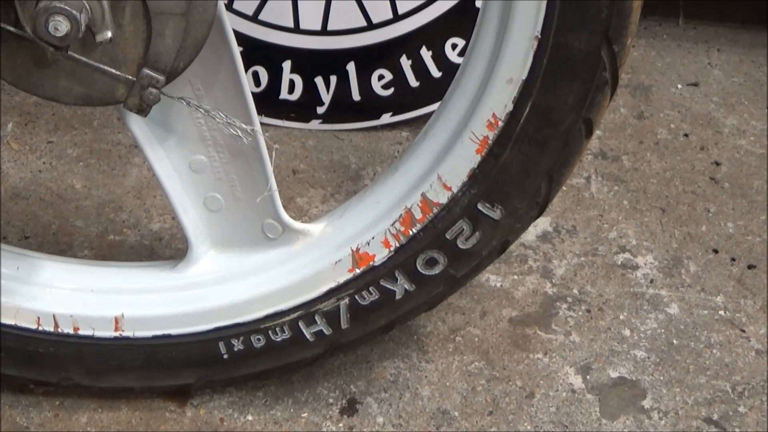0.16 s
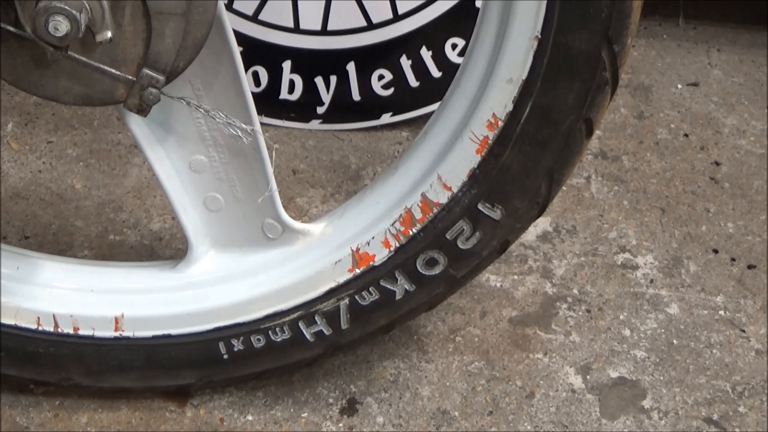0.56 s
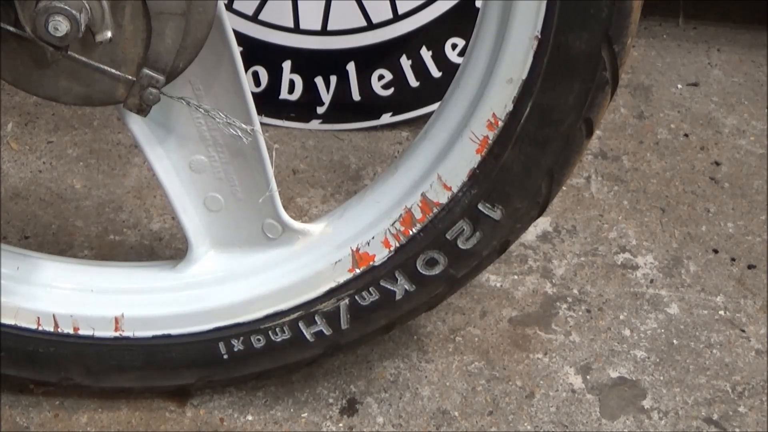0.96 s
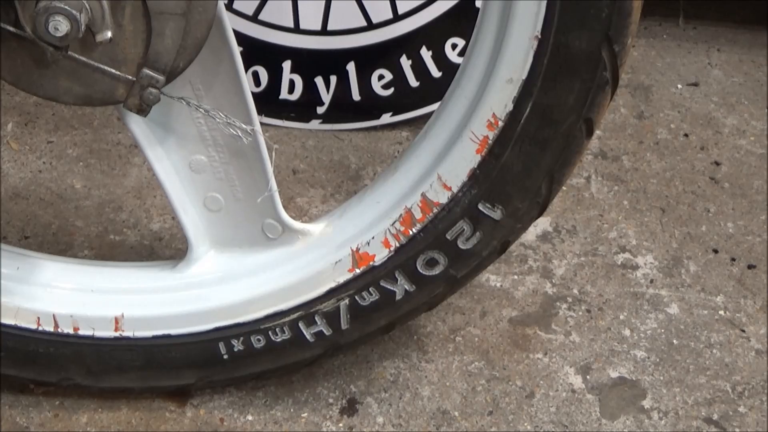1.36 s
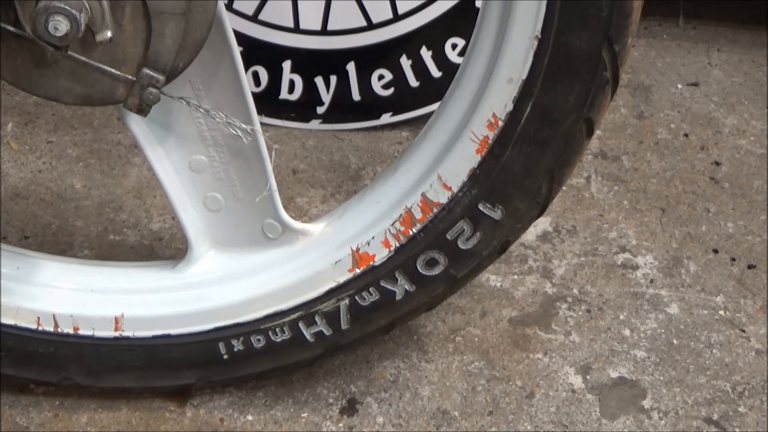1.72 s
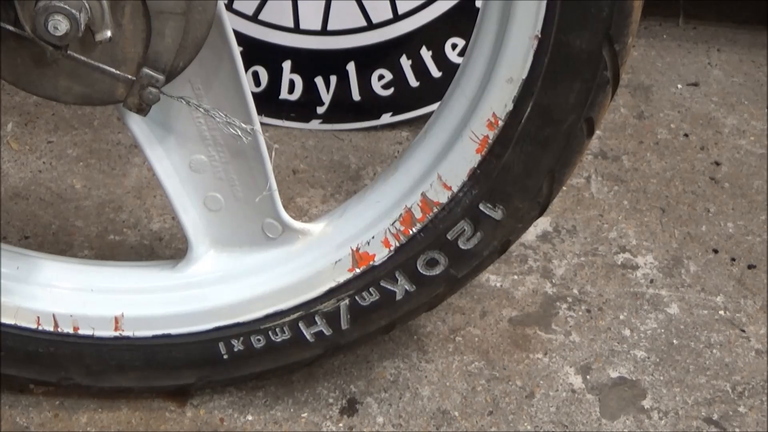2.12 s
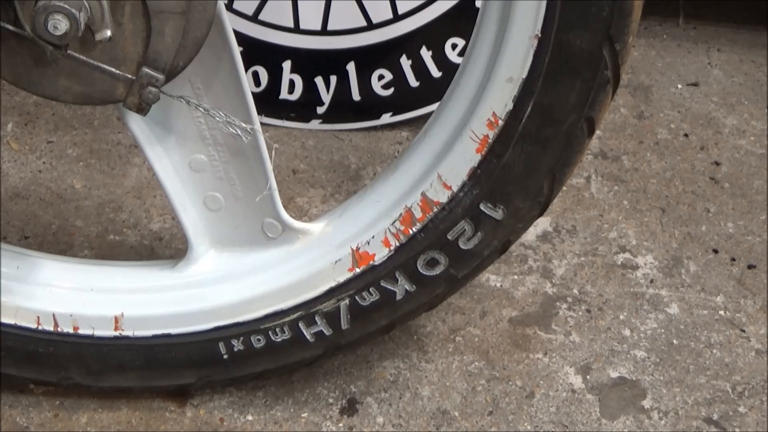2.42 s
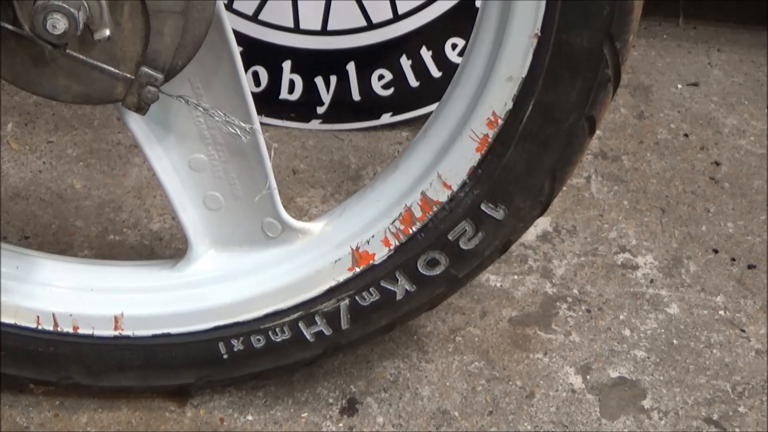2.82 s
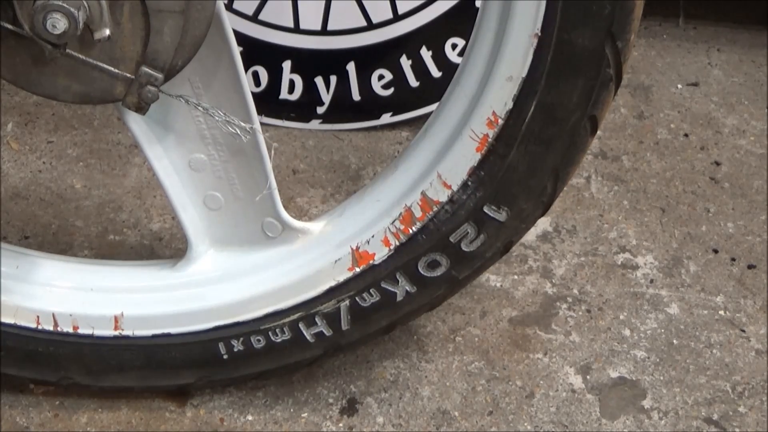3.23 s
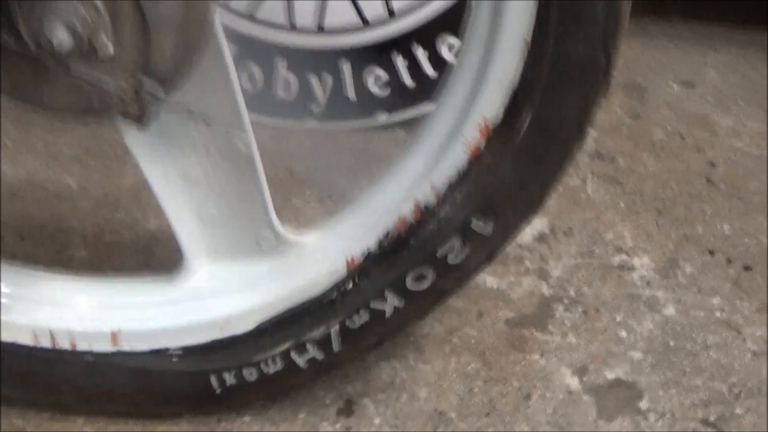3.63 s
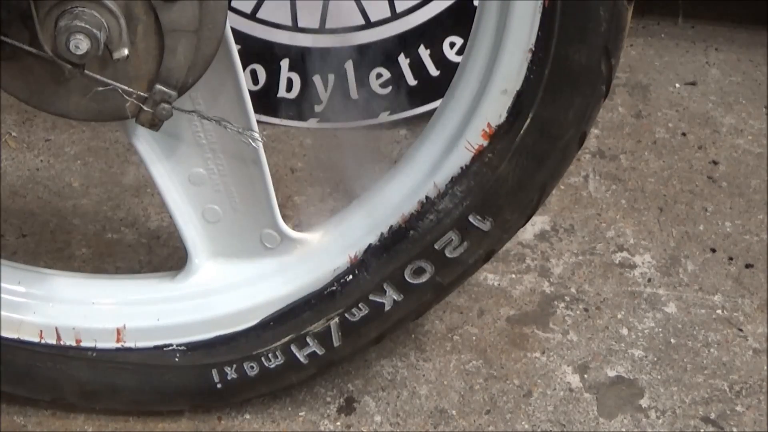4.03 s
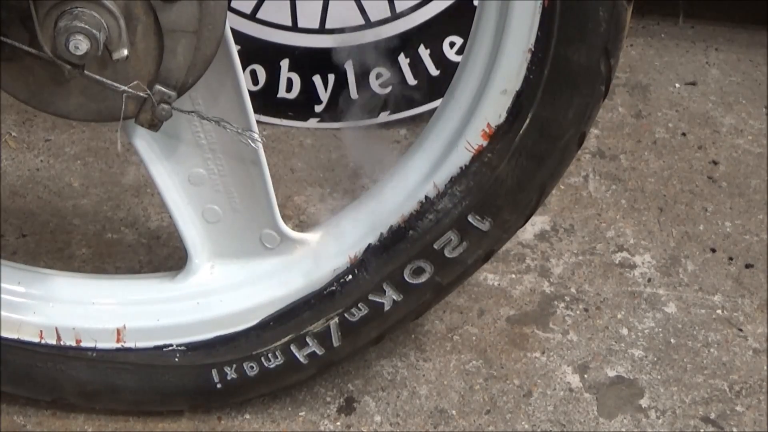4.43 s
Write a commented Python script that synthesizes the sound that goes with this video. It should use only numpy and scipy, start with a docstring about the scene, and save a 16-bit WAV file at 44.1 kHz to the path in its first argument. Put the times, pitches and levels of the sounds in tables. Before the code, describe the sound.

A brief, soft hiss of air and a tick at a tyre valve open the sound, heard close up over faint workshop hum. At about 1.2 seconds the tyre knocks on its rim, followed by soft bumps. Around 1.6 seconds the air nozzle clicks and spits, and compressed air starts hissing steadily with a thin metallic ring, growing louder over a slight rumble. Three quick, hollow knocks come near 2.5 seconds and another at 3 seconds. The rubber gives a small squeak at 3.4 seconds, then a sharp snap, a short creak and a rip. At about 3.6 seconds the tyre bursts with a loud bang and a short roar of air, by far the loudest event. A low ringing boom and rumble fade over the last second, while remaining air whistles thinly and the slack rubber rustles softly until about 4.5 seconds.

```python
"""A workshop floor: compressed air hisses through the valve of a worn moped tyre, ringing the stem.
The casing knocks and rubs on the rim as it stretches, then creaks, snaps its cords and rips open.
The tube bursts with a roaring blast that howls across the torn casing. The tyre is left booming on
a low note while the last air squeals out and the slack rubber rustles and settles."""
import sys
import numpy as np
from scipy import signal
from scipy.fft import rfft, irfft
from scipy.io import wavfile

SR = 44100
rng = np.random.default_rng(int(sys.argv[2]) if len(sys.argv) > 2 else 0)


def inscribe(sig):
    """Save sig as 16-bit PCM at rate SR to the path in sys.argv[1].

    A 1-D sig is mono; a 2-D sig holds one channel per row.
    Samples are clipped to [-1, 1] before scaling.
    """
    pcm = np.round(np.clip(np.atleast_2d(sig).T, -1, 1) * 32767)
    wavfile.write(sys.argv[1], SR, pcm.astype(np.int16))


N = 201477
T = np.arange(N) / SR
HZ = np.maximum(np.arange(N // 2 + 1) * SR / N, 1)
BURST_S, EMPTY_S = 3.6415, 3.78
BOOM_S, BOOM_RISE_S = 3.745, 0.046

# Noise spectra. Each row: frequency in Hz, relative density in dB.
ROAR_SPECTRUM = [(30, -24), (60, -12), (130, -4.5), (230, -9), (355, 1.5), (480, -6.5), (700, -8.5)]
RUSH_SPECTRUM = [(350, -19), (560, -8), (720, -2), (870, -5), (1050, -5), (1500, -3), (1900, -7),
                 (2600, -8), (3600, -9)]
HISS_SPECTRUM = [(1800, 2.5), (2700, -1.5), (4000, 1), (6000, 0.5), (9000, 0.5), (11500, -3), (15500, -17)]
TEAR_SPECTRUM = [(45, -16), (95, -7), (135, 0), (220, -12), (350, -8), (600, -10), (1000, -4), (1800, -5.5),
                 (3000, -10), (6000, -15.5), (10000, -20.5), (15000, -26)]
VALVE_SPECTRUM = [(300, -6), (700, -8), (1400, -7), (2800, -6.5), (3600, -6.5), (4600, -3), (5600, -4),
                  (7000, -7), (9000, -15)]
JET_SPECTRUM = [(5000, -27), (7300, -9), (7800, 1), (9300, 0.5), (11000, 1.5), (12800, 0), (13500, -3.5),
                (15800, -10)]
CRACK_SPECTRUM = [(60, -11), (150, -2.5), (300, -14), (600, -4.5), (1100, 1), (1800, -2.5), (2400, -3),
                  (6000, -5.5), (15000, 2.5)]
SPIT_SPECTRUM = [(1300, -11), (2200, -10.5), (2800, -2), (3400, 2.5), (4200, -7), (7000, -10),
                 (14000, -10.5)]
SQUEAL_SPECTRUM = [(5500, -6), (8000, -15), (9750, -2), (10400, -3), (11200, 4), (12100, -4), (12550, -7),
                   (13000, -4), (13600, -10), (14800, -20)]
RUBBER_SPECTRUM = [(530, -45), (900, -22), (1330, -9.5), (1890, -2.5), (4110, -6), (6130, -12),
                   (9700, -8.5), (12700, -23), (15000, -41)]
ROOM_SPECTRUM = [(15, -45), (25, -10), (114, -5), (185, -6), (301, -7), (405, -10), (575, -5), (641, -9),
                 (775, -9), (2350, -15), (2910, -16.5), (3720, -17.5), (16000, -26.5)]
# Resonances that colour noise. Each row: frequency in Hz, nominal width in Hz, nominal level in dB.
OPEN_CASING_MODES = [(352, 34, -0.5), (722, 34, 1), (853, 44, 0.5), (1022, 40, -0.5), (1173, 29, 4),
                     (1350, 30, -8), (1520, 68, -4)]
VALVE_MODES = [(2133, 30, -5.5), (2213, 15, -3.5), (3140, 80, -14.5), (3436, 94, -9), (3612, 49, -2.5),
               (3725, 45, -3.5), (3965, 33, 2), (4070, 45, 3), (4287, 79, -2), (4493, 39, -5.5),
               (4520, 42, 0), (4700, 54, -6.5), (4925, 70, -5), (6000, 130, -11.5)]
JET_MODES = [(7800, 250, -8), (8270, 130, -7), (8650, 70, -8), (9050, 150, -9), (9900, 170, 1),
             (10620, 55, 1), (10780, 50, -4), (11100, 100, -1), (11460, 45, 0), (11800, 80, -5),
             (12000, 60, -3), (12560, 100, -1), (12920, 120, -4)]
TRICKLE_MODES = [(2173, 20, 5.5), (5300, 300, -19), (7740, 78, -6), (8230, 85, -6.5), (9000, 110, -14),
                 (11460, 51, -16)]
HUM_MODES = [(554, 3.2, 7), (785, 10, -12), (942, 3.6, -5)]
# Ringing of the tyre, torn and taut. Each row: frequency in Hz, relative level in dB, t60 in seconds.
TORN_MODES = [(74.4, -15.5, 1.41), (136, -27, 0.94), (149, -32.5, 1.6), (184, -36.5, 1.33),
              (255, -35, 1.04), (290, -33, 0.92), (347.6, -37, 1.52), (363, -25.5, 0.84), (436, -28, 0.72),
              (615, -36, 0.88), (696, -35, .55), (820, -36, 0.38), (1194, -35, 0.28)]
TAUT_MODES = [(180, -5, 0.063), (262, -2, 0.13), (390, -3.5, 0.17), (489, -2, 0.1), (654, -2.5, .1),
              (740, -10, 0.18), (914, -6.5, 0.15), (1113, 0, 0.099), (1360, -6.5, 0.11), (1494, -6.5, 0.11),
              (1790, -0.5, 0.064), (2094, -2.5, 0.043), (2740, -11, 0.14), (2970, -11, .12),
              (6350, -22, .07)]
# Sidewall rips. Each row: start in seconds, shock level in dB, shock length in seconds, tearing in dB.
RIPS = [(3.574, -5.5, 0.00098, -8.5), (3.579, -18, 0.0016, -13.5), (3.5835, -9, 0.0033, -23),
        (3.5925, -4, .002, -19), (3.597, -5.5, .005, -26), (3.607, -11, 0.0031, -30),
        (3.6172, -0.5, 0.00097, -16.5)]
# Valve open. Each row: start in seconds, end in seconds.
VALVE_OPEN_S = [(-0.05, 0.102), (1.633, 3.63)]
# Air flow through the valve. Each row: time in seconds, level in dB.
VALVE_FLOW = [(0.05, -40.5), (1.78, -36.5), (2.38, -33.5), (2.77, -30), (3.3, -30), (3.51, -28.8),
              (3.56, -33)]
# Casing slips on the rim. Each row: start in seconds, level in dB, low-pass in Hz, thud gain.
KNOCKS = [(1.147, -32.5, 3600, 0.62), (1.2332, -20, 3980, 1.36), (2.502, -16, 2050, 0.94),
          (2.549, -16.5, 2100, 0.86), (2.626, -18.5, 1810, 0.85), (3.0, -14, 1900, 0.82)]
# Air chuck ticks on the valve, cords snap in the casing, soft bumps meet the wheel.
# Each row: start in seconds, level in dB, pitch in Hz, t60 in seconds.
CHUCK_TICKS = [(0.094, -24, 7000, 0.037), (0.579, -37, 9000, 0.01), (0.6345, -29, 9000, 0.0059),
               (1.589, -31, 2440, 0.043), (1.645, -25, 5500, .04), (1.656, -16.5, 5100, 0.054),
               (1.7161, -7.5, 4060, 0.02)]
CORD_SNAPS = [(3.5318, 5, 8500, 0.0072), (3.591, 0, 9600, 0.017), (3.607, -5, 6070, 0.018),
              (3.627, -9.5, 1740, .07)]
BUMPS = [(1.4035, -30.5, 540, 0.022), (1.41, -39, 298, 0.035), (1.477, -41.5, 476, .05),
         (1.493, -39, 533, 0.039), (1.835, -34.5, 456, 0.03)]
# Air spits at the chuck, air squeals from the tube, rubber rubs on the rim.
# Each row: start in seconds, level in dB, then attack, hold and t60 in seconds.
SPITS = [(0.005, -37, 0.055, 0.012, 0.15), (1.628, -38, 0.018, 0.036, 0.15),
         (1.7, -30, 0.019, 0.003, 0.075)]
SQUEALS = [(3.765, -33.5, 0.045, 0.02, 0.22), (3.885, -43, 0.035, 0.015, 0.2),
           (4.135, -56, 0.015, 0.008, 0.14)]
RUBS = [(3.405, -36, 0.018, 0.008, 0.13), (4.005, -44, 0.016, 0.015, 0.15)]
# Slack folds shift. Each row: start in seconds, level in dB, hold in seconds.
RUSTLES = [(4.0, -53, 0.003), (4.127, -52, 0.004), (4.203, -56, 0.002), (4.31, -44.5, 0.046),
           (4.434, -51.5, 0.035), (4.493, -46, 0.043)]
# Stereo width of the noise. Each row: frequency in Hz, side minus mid in dB.
STEREO_WIDTH = [(60, -38), (150, -12), (380, -8), (950, -5), (2400, -8), (6000, -12), (10000, -10),
                (14000, -24)]


def blast(flap_depth=0.18, rough_db=0.5):
    """The tube empties: a bright crack, a howl across the open casing, a roar chopped by the tear."""
    roar = emptying(0.022, surge_db=-16, hold_s=0.018, surge_t60_s=0.2062, flow_db=-24, flow_t60_s=0.81)
    rush = emptying(0.012, surge_db=-13.5, hold_s=0.025, surge_t60_s=0.45, flow_db=-18, flow_t60_s=0.22)
    hiss = emptying(0.0002, surge_db=-9, hold_s=0.002, surge_t60_s=0.22, flow_db=-23, flow_t60_s=0.44)
    casing = resonances(OPEN_CASING_MODES)
    roar = roar * noise(slope(ROAR_SPECTRUM))
    rush = rush * (from_db(-1.3) * noise(slope(RUSH_SPECTRUM)) + from_db(-9.5) * noise(casing))
    howl = swell(3.648, db=-14.5, attack_s=0.014, hold_s=0.02, t60_s=0.25) * noise(casing)
    hiss = hiss * noise(slope(HISS_SPECTRUM) * reflections(depth=0.37, longest_s=0.0087))
    flap_hz = TORN_MODES[0][0]
    flap = 1 + flap_depth * ramp(BOOM_S, BOOM_RISE_S) * sine(flap_hz, T - BOOM_S)
    return (roar * pan(5.2) + (rush + howl) * pan(0.91) + hiss) * flap * from_db(rough_db * drift(90))


def emptying(attack_s, surge_db, hold_s, surge_t60_s, flow_db, flow_t60_s, room_db=-20.5, room_t60_s=1):
    """Envelope of one band of the blast: surge, steady outflow, aftersound in the workshop."""
    flow_s = EMPTY_S - BURST_S - attack_s
    return swells([(BURST_S, surge_db, attack_s, hold_s, surge_t60_s),
                   (BURST_S, flow_db, attack_s, flow_s, flow_t60_s),
                   (BURST_S, flow_db + room_db, attack_s, flow_s, room_t60_s)])


def boom(waver_db=2.5, rumble_db=-35, rumble_t60_s=1.0):
    """Escaping air swells the modes of the torn tyre, which ring out over a rumble."""
    age_s = np.maximum(T - BOOM_S - BOOM_RISE_S, 0)
    ring = 0
    for hz, db, t60_s in TORN_MODES:
        level = from_db(db + waver_db * drift(21) * min(hz / 200, 1))
        ring += level * decay(age_s, t60_s) * sine(hz, T - BOOM_S)
    rumble = from_db(rumble_db) * noise(slope([(30, -12), (80, 0), (200, 2), (450, -18)]))
    return (ring + rumble * decay(age_s, rumble_t60_s)) * ramp(BOOM_S, BOOM_RISE_S) * pan(5.5)


def rips(tear_t60_s=0.11, lowpass_hz=6000):
    """Each rip of the sidewall sends out an N-shaped shock and a spray of tearing noise."""
    shocks, tear_power = np.zeros((2, N)), 0
    for start_s, db, length_s, tear_db in RIPS:
        add(shocks, start_s, from_db(db) * np.linspace(1, -1, int(length_s * SR)))
        tear_power += (from_db(tear_db) * dying(start_s, tear_t60_s)) ** 2
    shocks = workshop(filtered(shocks, lowpass_hz, "low"), wet_db=-12, t60_s=0.18, lowpass_hz=2500)
    return (shocks + np.sqrt(tear_power) * noise(slope(TEAR_SPECTRUM))) * pan(1.5)


def inflation(attack_s=0.013, shut_t60_s=0.17, jet_growth_db=4, sharpen_db=5.0, flutter_db=0.61):
    """Turbulence in the valve rings the stem; as the tyre fills, the jet grows and rings more."""
    fill_s = VALVE_OPEN_S[1][0]
    pressure = ramp(fill_s, BURST_S - fill_s)
    flow_db = np.interp(T, *np.transpose(VALVE_FLOW))
    jet_db = flow_db - 2.5 + jet_growth_db * pressure ** 2.4
    opening = swells([(on_s, 0, attack_s, off_s - on_s - attack_s, shut_t60_s)
                      for on_s, off_s in VALVE_OPEN_S])
    sharpness = from_db(sharpen_db * (pressure - 0.5))
    comb = reflections(depth=0.7, longest_s=0.012)
    stem_ring = from_db(0.0) * noise(resonances(VALVE_MODES) ** 1.24)  # the power sharpens the peaks
    valve_hiss = from_db(-6.5) * noise(slope(VALVE_SPECTRUM) * comb)
    jet_ring = from_db(-3.7) * sharpness * noise(resonances(JET_MODES) ** 1.3 * slope(JET_SPECTRUM))
    jet_hiss = from_db(-1.5) / sharpness * noise(slope(JET_SPECTRUM) * comb)
    valve = from_db(flow_db + flutter_db * drift(19)) * (stem_ring + valve_hiss)
    jet = from_db(jet_db + flutter_db * drift(25)) * (jet_ring + jet_hiss)
    return opening * (valve + jet) * pan(0.81)


def knocks(crack_db=-1.5, crack_t60_s=0.13, ring_db=-11, thud_hz=325, thud_s=0.0035, thud_lag_s=0.018):
    """Each slip on the rim cracks and rings the taut casing; a hollow thud follows round the tyre."""
    out, size = np.zeros((2, N)), SR // 3
    t = T[:size]
    grit = noise(slope(CRACK_SPECTRUM))
    thud = from_db(-6) * sine(thud_hz, t) * np.exp(-((t - thud_lag_s) / thud_s) ** 2)
    rings = np.array([from_db(db + ring_db) * decay(t, t60_s) * sine(hz, t)
                      for hz, db, t60_s in TAUT_MODES])
    for start_s, db, lowpass_hz, thud_gain in KNOCKS:
        at = int(start_s * SR)
        crack = from_db(crack_db) * grit[:, at:at + size] * decay(t, crack_t60_s)
        mode_gains = from_db(rng.normal(0, 0.74, len(rings))) * rng.choice([-1, 1], len(rings))
        knock = crack + thud_gain * thud + mode_gains @ rings
        add(out, start_s, from_db(db) * filtered(knock, lowpass_hz, "low"))
    return workshop(filtered(out, 176, "high"), wet_db=-15.5, t60_s=0.26, lowpass_hz=2600) * pan(2.0)


def snaps(rows, band_ratio=1.4, grain_db=-11, click_t60_cycles=6.7):
    """Each snap rings a few cycles at its own pitch and leaves a short grainy tail."""
    out, t = np.zeros((2, N)), T[:SR // 8]
    for start_s, db, hz, t60_s in rows:
        click = sine(hz, t) * decay(t, click_t60_cycles / hz)
        grain = filtered(rng.standard_normal(len(t)), [hz / band_ratio, hz * band_ratio], "band", 3)
        tail = from_db(grain_db) * unit_rms(grain) * decay(t, t60_s)
        add(out, start_s, from_db(db) * filtered(click + tail, hz / 2, "high"))
    return workshop(out, wet_db=-11, t60_s=0.25, lowpass_hz=5000)


def creak_slips(start_s=3.5443, gap_s=0.0064, db=-10.8, hz=1900, t60_s=0.014, count=5):
    """The sidewall creaks before it gives: evenly spaced slips, as rows for snaps()."""
    return [(start_s + k * gap_s, db, hz, t60_s) for k in range(count)]


def squeal(from_hz=11300, to_hz=12000, glide_s=0.16, width_hz=280, hiss_db=0.5, sputter_db=1.8):
    """The last air sputters out with a thin whistle that rises as the tear closes."""
    hz = from_hz + (to_hz - from_hz) * ramp(SQUEALS[0][0], glide_s)
    whistle = unit_rms(drift(width_hz) * np.sin(2 * np.pi * np.cumsum(hz) / SR))
    puffs = swells(SQUEALS) * from_db(sputter_db * drift(60))
    return puffs * (whistle + from_db(hiss_db) * noise(slope(SQUEAL_SPECTRUM)))


def spit(sputter_db=2.0):
    """Air escapes round the seal of the chuck as it is pressed on and off."""
    return swells(SPITS) * from_db(sputter_db * drift(80)) * noise(slope(SPIT_SPECTRUM))


def bumps(grit_db=-5):
    """Soft bumps on the wheel: a dull, brief note with a little contact noise."""
    out, t = np.zeros((2, N)), T[:SR // 8]
    for start_s, db, hz, t60_s in BUMPS:
        grit = unit_rms(filtered(rng.standard_normal(len(t)), [hz / 2, hz * 2], "band"))
        add(out, start_s, from_db(db) * (sine(hz, t) + from_db(grit_db) * grit) * decay(t, t60_s))
    return workshop(out, wet_db=-14.5, t60_s=0.23, lowpass_hz=2000)


def rubs(chirp_hz=1670, hiss_db=-10):
    """Stretched rubber slides on the rim and sings in one broad resonance."""
    chirp = noise(resonances([(chirp_hz, 260, 0)]) ** 2)
    return swells(RUBS) * (chirp + from_db(hiss_db) * noise(slope(RUBBER_SPECTRUM)))


def trickle():
    """A trickle of air sings on in narrow resonances as the valve first shuts."""
    return swell(0, db=-45.5, attack_s=0.15, hold_s=0.07, t60_s=0.65) * noise(resonances(TRICKLE_MODES))


def rustle(attack_s=0.023, t60_s=0.17, grain_db=1.2):
    """Slack rubber settles in short grainy slides."""
    slides = swells([(start_s, db, attack_s, hold_s, t60_s) for start_s, db, hold_s in RUSTLES])
    return slides * from_db(grain_db * drift(150)) * noise(slope(RUBBER_SPECTRUM))


def background(air_db=-53.5, hum_db=-65, rumble_db=-64, growth_db=18.5, grow_from_s=1.1, t60_s=3.3):
    """Workshop air, a faint hum and a low rumble that grows until the burst, then fades."""
    level = from_db(rumble_db + growth_db * ramp(grow_from_s, BURST_S - grow_from_s))
    fade = decay(T - BURST_S, t60_s)
    rumble = level * fade * noise(slope([(28, -42), (58, 1), (75, -13.5), (110, -8.5)]))
    air = from_db(air_db) * noise(slope(ROOM_SPECTRUM))
    return air + from_db(hum_db) * noise(resonances(HUM_MODES)) + rumble


def workshop(x, wet_db, t60_s, lowpass_hz):
    """Direct sound plus a short, dull scatter from floor and walls."""
    tail = filtered(rng.standard_normal((2, N)), lowpass_hz, "low", order=1) * dying(0.00134, t60_s)
    tail = tail[:, :SR // 2] / np.sqrt(np.sum(tail ** 2) / 2)
    return x + from_db(wet_db) * signal.fftconvolve(x, tail, axes=1)[:, :N]


def reflections(depth, longest_s, count=14):
    """Reflections between rim, spokes and floor comb the spectrum."""
    lags_s = rng.uniform(longest_s / 8, longest_s, count)
    return np.abs(1 + depth / np.sqrt(count) * sum(np.exp(-2j * np.pi * HZ * lag) for lag in lags_s))


def from_db(db):
    """Decibels to gain."""
    return 10 ** (np.asarray(db) / 20)


def unit_rms(x):
    """Scale to unit power."""
    return x / np.sqrt(np.mean(x ** 2) + 1e-20)


def sine(hz, t):
    """Unit sine over t in seconds."""
    return np.sin(2 * np.pi * hz * t)


def slope(points):
    """Gain per frequency through (Hz, dB) points; 24 dB per octave down past the ends."""
    hz, db = np.transpose(points)
    octaves_outside = np.abs(np.log2(HZ / np.clip(HZ, hz.min(), hz.max())))
    return from_db(np.interp(np.log(HZ), np.log(hz), db) - 24 * octaves_outside)


def resonances(modes):
    """Gain per frequency of resonances added in power."""
    return np.sqrt(sum(from_db(db) ** 2 / (1 + ((HZ ** 2 - hz ** 2) / (HZ * width_hz)) ** 2)
                       for hz, width_hz, db in modes))


def noise(colour):
    """Coloured stereo noise, unit power."""
    mid, side = rfft(rng.standard_normal((2, N)))
    hz, db = np.transpose(STEREO_WIDTH)
    side *= from_db(np.interp(np.log(HZ), np.log(hz), db))
    return unit_rms(irfft(colour * np.array([mid + side, mid - side]), N))


def drift(rate_hz):
    """Smooth random wander, unit power."""
    return unit_rms(irfft(rfft(rng.standard_normal(N)) / (1 + (HZ / rate_hz) ** 2), N))


def pan(left_db):
    """Channel gains, left over right by left_db."""
    return from_db(np.array([[left_db], [-left_db]]) / 2)


def ramp(start_s, length_s):
    """Linear rise from 0 to 1."""
    return np.clip((T - start_s) / length_s, 0, 1)


def decay(age_s, t60_s):
    """1 until age zero, then 60 dB down per t60."""
    return from_db(-60 * np.clip(age_s / t60_s, 0, 4))


def dying(start_s, t60_s):
    """Jump to 1, then decay."""
    return (T >= start_s) * decay(T - start_s, t60_s)


def swell(start_s, db, attack_s, hold_s, t60_s):
    """Rise, hold, decay."""
    return from_db(db) * ramp(start_s, attack_s) * decay(T - start_s - attack_s - hold_s, t60_s)


def swells(rows):
    """Swells added in power."""
    return np.sqrt(sum(swell(*row) ** 2 for row in rows))


def filtered(x, hz, kind, order=2):
    """Butterworth filter."""
    sos = signal.butter(order, np.clip(hz, 10, 0.45 * SR), kind, fs=SR, output="sos")
    return signal.sosfilt(sos, x + 1e-18)


def add(out, start_s, sound):
    """Mix in a short sound."""
    at = int(start_s * SR)
    out[:, at:at + sound.shape[-1]] += sound[..., :N - at]


def scene():
    """Filling, straining, bursting, settling."""
    filling = background() + inflation() + spit() + trickle()
    straining = knocks() + bumps() + snaps([*CHUCK_TICKS, *CORD_SNAPS, *creak_slips()]) + rubs() + rips()
    return filling + straining + blast() + boom() + squeal() + rustle()


def record(dry, ceiling=0.82, cutoff_hz=15900):
    """Soft clip, then a steep low-pass."""
    lowpass = signal.ellip(10, 0.1, 80, cutoff_hz, fs=SR, output="sos")
    return signal.sosfilt(lowpass, ceiling * np.tanh(dry / ceiling))


dry = scene()
out = record(dry)
inscribe(out)
```